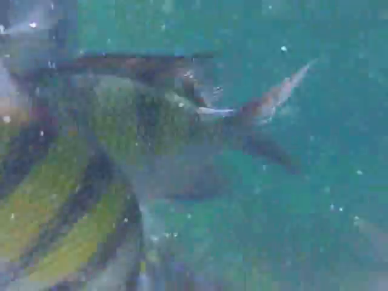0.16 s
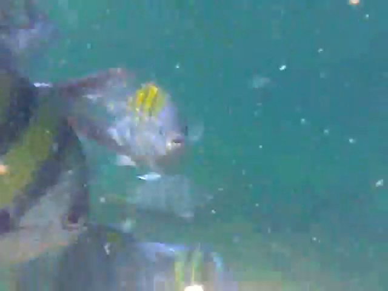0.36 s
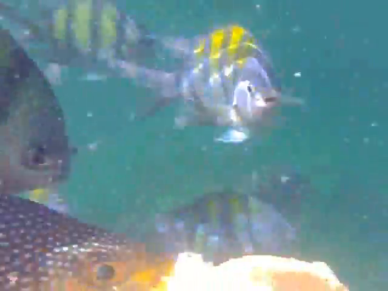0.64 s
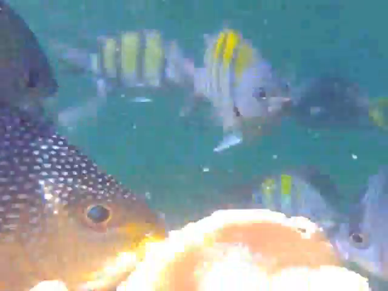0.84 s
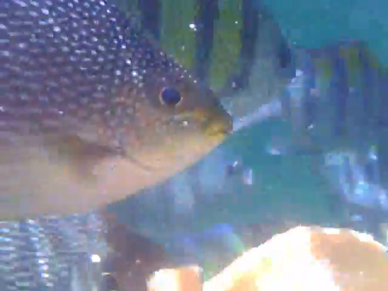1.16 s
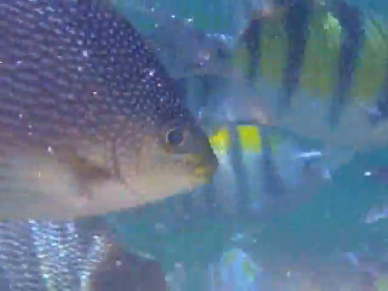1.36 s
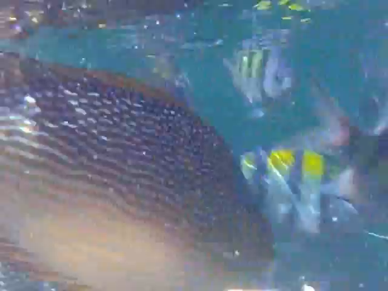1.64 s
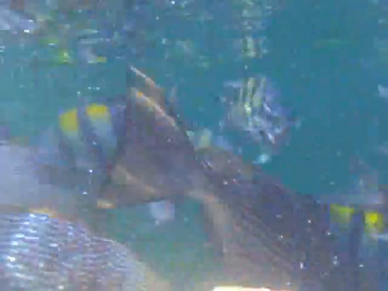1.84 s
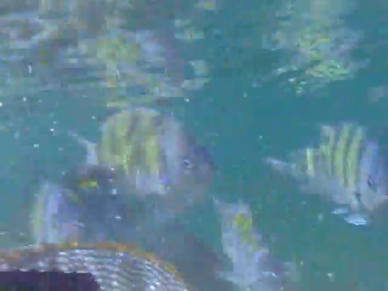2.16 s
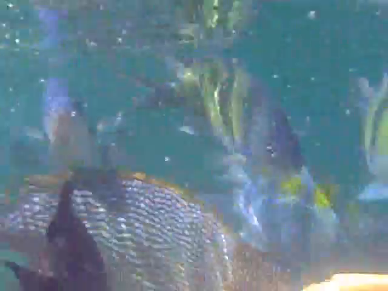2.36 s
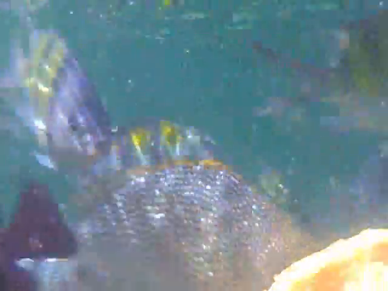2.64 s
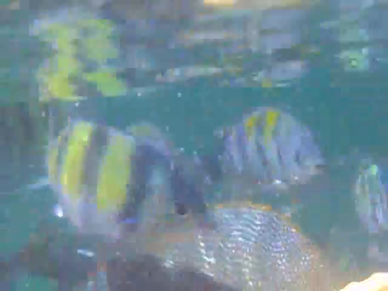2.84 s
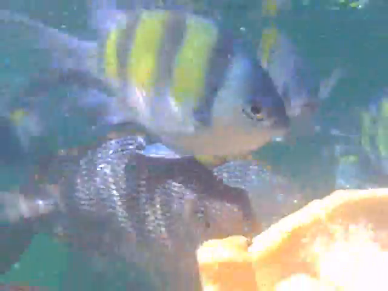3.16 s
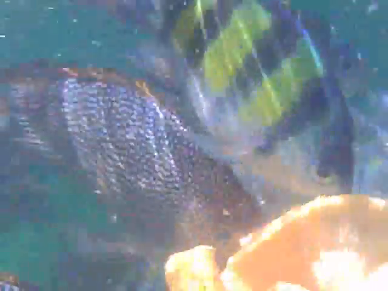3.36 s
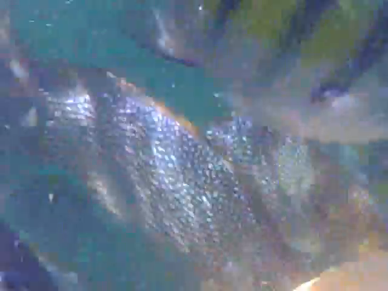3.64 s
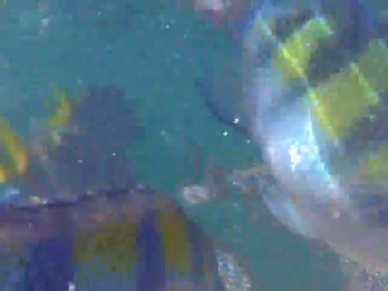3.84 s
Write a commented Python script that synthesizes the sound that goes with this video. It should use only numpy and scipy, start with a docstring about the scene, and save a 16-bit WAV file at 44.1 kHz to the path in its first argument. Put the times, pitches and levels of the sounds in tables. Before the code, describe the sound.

Irregular muffled bumps on a submerged camera housing, with deep water rumble and faint bubbles.

```python
"""A camera housing rings low as fish and hands bump and rub it, just under the sea surface.
Impacts excite the damped modes of its shell, and friction drives them continuously. Bubbles ring and
gurgle as resonators, far shrimp tick, and the swell presses on the housing over a rumble and wash.
The camera samples slowly and holds each value, so images of the low sound appear in the treble."""
import sys
import numpy as np
from scipy import signal
from scipy.fft import rfft, irfft
from scipy.io import wavfile
from scipy.ndimage import uniform_filter1d

SR = 44100
rng = np.random.default_rng(int(sys.argv[2]) if len(sys.argv) > 2 else 0)


def generate_wav(signal):
    """Clip the signal to [-1, 1] and save it as 16-bit WAV at the path in sys.argv[1]."""
    frames = np.transpose(np.atleast_2d(signal))
    scaled = np.clip(frames, -1, 1) * 32767
    pcm = np.round(scaled).astype(np.int16)
    wavfile.write(sys.argv[1], SR, pcm)


N = 176400


# Impacts on the shell: start_s, low_db, low_hz, upper_db, upper_hz, rap_db, low_t60_s, low_rise_s
SHELL_IMPACTS = [(0.145, -33, 138.6, -72, 264, -67, 0.22, 0.005),
                 (0.248, -18, 132.3, -43, 262, -62, 0.099, 0.0068),
                 (0.377, -11.5, 157.4, -21, 312, -33.5, 0.14, 0.0027),
                 (0.469, -45, 150, -34, 330, -41, 0.055, 0.0028),
                 (0.481, -16.5, 149.6, -29.5, 327, -40, 0.18, 0.004),
                 (0.509, -13, 138, -14.5, 252, -45, 0.044, 0.003),
                 (0.521, -19, 168, -18.5, 253, -42, 0.046, 0.0046),
                 (0.566, -18.5, 113, -29, 260, -63, 0.049, 0.0057),
                 (0.6, -25.5, 148.4, -30.5, 283, -69, 0.073, 0.0067),
                 (0.726, -30, 178, -35, 258, -57, 0.065, 0.0052),
                 (0.762, -32, 191, -57, 280, -68, 0.066, 0.0027),
                 (0.823, -16, 171.8, -35.5, 283, -67, 0.062, 0.0037),
                 (0.875, -34, 151.4, -33.5, 341, -59, 0.17, 0.0026),
                 (1.139, -30, 138, -56, 320, -70, 0.12, 0.0045),
                 (1.183, -26, 173, -50, 261, -65, 0.082, 0.002),
                 (1.265, -40, 138, -60, 277, -65, 0.046, 0.0093),
                 (1.472, -70, 159, -28, 278, -78, 0.052, 0.0075),
                 (1.633, -28.5, 145, -31, 290, -41, 0.067, 0.0029),
                 (1.745, -34.5, 116, -39.5, 263, -60, 0.085, 0.0084),
                 (1.938, -42.5, 211, -27, 266.4, -51, 0.22, 0.0061),
                 (2.016, -33.5, 139, -42.5, 353, -56, 0.058, 0.0045),
                 (2.1, -32, 197, -16.5, 267, -54, 0.06, 0.0071),
                 (2.112, -19.5, 150, -23.5, 303, -44.5, 0.076, 0.0033),
                 (2.273, -22.5, 176, -13.5, 266, -37, 0.035, 0.004),
                 (2.2912, -19, 135, -12.5, 300, -31.5, 0.073, 0.0034),
                 (2.495, -30, 171, -43, 266, -64, 0.021, 0.003),
                 (2.848, -34.5, 123, -31, 280, -54, 0.046, 0.0052),
                 (2.887, -34.5, 122.5, -29.5, 330, -40.5, 0.11, 0.0054),
                 (2.919, -50, 125, -30.5, 305, -67, 0.069, 0.0012),
                 (3.425, -17.5, 154.7, -19.5, 253, -42, 0.063, 0.005),
                 (3.448, -17, 129.6, -43, 261, -47.5, 0.1, 0.003),
                 (3.479, -12.5, 165.2, -45, 260, -53, 0.057, 0.0065),
                 (3.7, -30, 186.5, -40.5, 307, -58, 0.078, 0.0044),
                 (3.934, -24, 140, -61, 250, -56, 0.13, 0.0028)]

def shell_bumps():
    """Modal vibration: each impact excites four damped modes, the higher ones just after the lowest."""
    out = np.zeros(N)
    rap_hz, knock_hz, lag_s = 717, 440, 0.003
    for start_s, low_db, low_hz, upper_db, upper_hz, rap_db, t60_s, rise_s in SHELL_IMPACTS:
        add_ring(out, start_s - 0.84 * rise_s, low_db, low_hz, t60_s, rise_s, fade=0.94)
        add_ring(out, start_s + lag_s / 2, upper_db, upper_hz, t60_s / 2, rise_s=0.0013, fade=0.94)
        add_ring(out, start_s + lag_s, rap_db, rap_hz, t60_s=0.015, rise_s=0.0018, fade=1.72)
        add_ring(out, start_s + lag_s, rap_db + 2.5, knock_hz, t60_s=0.027, rise_s=0.0018, fade=1.72)
    add_ring(out, 0, level_db=-21, pitch_hz=155, t60_s=0.22, rise_s=0.0013)  # an opening ring fades
    return -out  # the shell gives inward first


# Shoves on the housing: start_s, level_db, pitch_hz
HOUSING_SHOVES = [(0.172, -22.5, 34.3), (0.486, -13.5, 35.3), (0.869, -28, 30), (0.927, -24, 33.5),
                  (1.16, -36, 90), (2.288, -21, 95), (2.888, -28, 79.6), (3.322, -42, 59),
                  (3.436, -13.5, 34.3), (3.929, -20, 68.5)]

def housing_thuds():
    """Heavily damped motion: the whole housing yields in one slow push, spent within a cycle."""
    out = np.zeros(N)
    for start_s, level_db, pitch_hz in HOUSING_SHOVES:
        add_ring(out, start_s, level_db, pitch_hz, t60_s=0.58 / pitch_hz, rise_s=0.62 / pitch_hz, fade=0.98)
    return out


# Strength of the rubbed modes: time_s, low_db, upper_db
RUB_LEVELS = [(0.0, -55, -65), (0.32, -42.5, -101), (0.47, -39, -51.5), (0.57, -27, -42.5),
              (0.72, -40.5, -56), (0.89, -43, -54), (1.06, -54, -56.5), (1.17, -39, -59.5),
              (1.26, -43.5, -80), (1.46, -56, -52), (1.6, -52.5, -50), (1.99, -50, -58.5),
              (2.23, -47.5, -41.5), (2.35, -49, -54), (2.56, -52.5, -57), (2.83, -53.5, -51),
              (2.99, -51, -48), (3.34, -49.5, -49), (3.52, -43, -65), (4.0, -41, -62)]

def shell_rubbing():
    """Forced vibration: uneven friction and flow keep the shell's low and upper modes sounding."""
    low = grainy_band(centre_hz=147, width_hz=36.2, spread_db=2.5, grains_per_s=46)
    upper = grainy_band(centre_hz=295.6, width_hz=120, spread_db=2.5, grains_per_s=80)
    return low * gain_curve(RUB_LEVELS, 1) + upper * gain_curve(RUB_LEVELS, 2)


# Single bubbles: start_s, level_db, pitch_hz, t60_s
BUBBLE_RINGS = [(.076, -51.5, 1390, 0.009), (.843, -50, 940, 0.011), (1.234, -53, 1290, .012),
                (1.543, -42.5, 1490, 0.0058), (1.548, -54, 2700, .01), (1.944, -44, 1004, 0.043),
                (2.178, -38, 790, 0.02), (2.195, -33, 650, 0.0091), (2.909, -51.5, 3900, 0.024),
                (2.917, -39.5, 850, 0.026), (2.922, -54.5, 1940, 0.081), (2.964, -40, 452, 0.24),
                (2.973, -38.5, 1043, 0.056), (3.0, -43.5, 1190, 0.033), (3.076, -33.5, 467, 0.12),
                (3.078, -42.5, 1670, 0.0088), (3.107, -35, 2270, 0.017), (3.135, -44.5, 2550, 0.0083),
                (3.145, -39.5, 950, 0.049), (3.144, -50.5, 3580, 0.015), (3.246, -50, 1980, 0.02),
                (3.258, -40.5, 1900, 0.02), (3.273, -52, 1460, 0.016), (3.369, -56, 3180, 0.01),
                (3.4255, -36.5, 1660, 0.0016)]

def bubbles():
    """Bubble resonance: trapped air is a spring, the water a mass; each hisses as it breaks off."""
    out = np.zeros(N)
    hiss_db, hiss_samples = -14.5, 2048  # level relative to the ring
    for start_s, level_db, pitch_hz, t60_s in BUBBLE_RINGS:
        add_ring(out, start_s, level_db, pitch_hz, t60_s, rise_s=0.00028, glide=-0.046)
        hiss = unit_rms(resonance(rng.standard_normal(hiss_samples), 0.96 * pitch_hz, 0.11 * pitch_hz))
        age = np.arange(hiss_samples) / (0.12 * t60_s * SR)  # in rise times of the hiss
        envelope = age * np.exp(1 - age)
        first = int(start_s * SR)
        out[first:first + hiss_samples] += undb(level_db + hiss_db) * envelope * hiss
    return out


# Strength of two bubble clouds: time_s, high_db, low_db
GURGLE_LEVELS = [(0.05, -80, -78), (0.42, -113, -85), (0.58, -70, -74), (0.96, -76.5, -101),
                 (1.42, -70.5, -72), (1.62, -61.5, -76), (1.97, -66.5, -67.5), (2.19, -58.5, -82),
                 (2.59, -62, -64), (2.83, -60, -70), (3.02, -55, -48), (3.12, -54, -66), (3.31, -55.5, -51),
                 (3.48, -64, -65), (3.76, -73.5, -80.5), (4.0, -70, -88)]

def gurgle():
    """Superposition: clouds of smaller and larger bubbles merge into a high and a low gurgle."""
    high = bubble_cloud(centre_hz=1036, spread_octaves=0.43, count=3000)
    low = bubble_cloud(centre_hz=490, spread_octaves=0.298, count=900)
    return high * gain_curve(GURGLE_LEVELS, 1) + low * gain_curve(GURGLE_LEVELS, 2)


def bubble_cloud(centre_hz, spread_octaves, count):
    """Size sets resonance: similar bubbles ring near one pitch at random times, each gliding up."""
    out = np.zeros(N)
    starts_s = rng.random(count) * N / SR
    pitches_hz = centre_hz * 2 ** (spread_octaves * rng.uniform(-1.01, 1, count))
    levels_db = rng.exponential(2, count)
    for start_s, level_db, hz in zip(starts_s, levels_db, pitches_hz):
        add_ring(out, start_s, level_db, hz, t60_s=28.6 / hz, rise_s=1 / hz, glide=0.18)
    return unit_rms(out)


# Clear shrimp snaps: time_s, level_db
SHRIMP_SNAPS = [(0.0772, -51), (0.097, -51), (0.3456, -55), (0.419, -49), (0.645, -52), (0.7296, -53),
                (0.916, -55), (1.249, -55), (1.29, -49), (1.5334, -49), (1.545, -50), (1.616, -57),
                (1.7012, -55), (1.7582, -50.5), (1.793, -54), (1.8144, -51), (1.982, -57), (2.028, -55),
                (2.4094, -55), (2.5895, -54), (3.0985, -48), (3.1451, -47), (3.3206, -49.5), (3.4265, -58)]

def shrimp(faint_count=200, snap_s=0.0024):
    """Broadband transients: far snaps arrive as short bright ticks, a few clear and many faint."""
    impulses = np.zeros(N)
    impulses[rng.integers(0, N, faint_count)] = undb(-65 - rng.exponential(0.5, faint_count))
    for time_s, level_db in SHRIMP_SNAPS:
        impulses[int(time_s * SR)] = undb(level_db)
    envelope = np.convolve(impulses, np.hanning(int(snap_s * SR) + 3), "same")
    return envelope * unit_rms(resonance(rng.standard_normal(N), centre_hz=7000, width_hz=3500))


# Surges of the swell: peak_s, pressure_full_scale, half_width_s
SWELL_SURGES = [(0.02, -.13, .06), (0.36, .04, .13), (1.24, .11, .06), (1.52, -.125, .08), (1.8, .095, .12),
                (2.12, -.12, .07), (2.4, .07, .1), (2.545, -.11, .03), (3.31, -.07, .07), (3.47, .17, .08),
                (3.76, -.14, .05)]

def swell(chop_hz=7, chop_db=-35):
    """Wave pressure: slow Gaussian surges press on the housing while small waves rock it."""
    t = np.arange(N) / SR
    surges = sum(pressure * np.exp(-((t - peak_s) / half_width_s) ** 2)
                 for peak_s, pressure, half_width_s in SWELL_SURGES)
    chop = rng.standard_normal(N)
    for width_hz in (chop_hz, 2 * chop_hz, 2 * chop_hz):
        chop = resonance(chop, chop_hz, width_hz)
    return surges + undb(chop_db) * unit_rms(chop)


# Strength of the moving water: time_s, level_db
RUMBLE_LEVELS = [(0.0, -30), (0.21, -61), (0.46, -52), (0.5, -18.5), (0.55, -39), (1.25, -41), (1.45, -53),
                 (1.6, -48.5), (1.8, -49.5), (2.28, -49.5), (2.37, -37), (2.46, -62), (2.58, -42.5),
                 (2.72, -50), (3.0, -45.5), (3.16, -54), (3.42, -29.5), (3.6, -39.5), (4.0, -53)]

def water_rumble():
    """Random pressure fluctuation: moving water makes a deep rumble and a more uneven slosh."""
    rumble = grainy_band(centre_hz=25.8, width_hz=28.4, spread_db=1.8, grains_per_s=15)
    slosh = grainy_band(centre_hz=94.6, width_hz=40.6, spread_db=8.5, grains_per_s=25.83)
    return (rumble + undb(-5) * slosh) * gain_curve(RUMBLE_LEVELS, 1)


# Spectrum of the sea's wash: frequency_hz, relative_density_db
WASH_SPECTRUM = [(120, -61), (200, 11), (277, -2), (322, -28), (657, -71), (774, -21.5), (2100, -22.5),
                 (7000, -29), (9100, -7), (15400, -120)]

def sea_wash(level_db=-56.5):
    """Stationary noise: the sea's steady wash keeps one spectral shape, strongest in the bass."""
    hz, density_db = np.array(WASH_SPECTRUM).T
    log_bins = np.log(np.fft.rfftfreq(N, 1 / SR) + 1)
    colour = undb(np.interp(log_bins, np.log(hz), density_db, left=-80, right=-80))
    return undb(level_db) * unit_rms(irfft(rfft(rng.standard_normal(N)) * colour, N))


def add_ring(out, start_s, level_db, pitch_hz, t60_s, rise_s, glide=0., fade=1.):
    """Damped oscillation, its envelope peaking at level_db; fade 1 is exponential, 2 Gaussian."""
    t = np.arange(int((t60_s + 4 * rise_s) * SR)) / SR
    attack = (1 - np.exp(-t / rise_s)) ** 2
    envelope = attack * np.exp(-np.log(1000) * (t / t60_s) ** fade)
    ring = envelope / envelope.max() * np.sin(2 * np.pi * pitch_hz * t * (1 + glide * t / t60_s))
    first = max(int(start_s * SR), 0)
    out[first:first + len(t)] += undb(level_db) * ring[:N - first]


def grainy_band(centre_hz, width_hz, spread_db, grains_per_s):
    """Amplitude modulation: noise in uneven grains drives two resonances in series."""
    grain_samples = int(SR / grains_per_s)
    grain_db = spread_db * np.minimum(rng.exponential(size=N // grain_samples + 1), 2.03)
    envelope = uniform_filter1d(np.repeat(undb(grain_db), grain_samples)[:N], grain_samples)
    narrow = resonance(rng.standard_normal(N) * envelope, centre_hz, width_hz)
    return unit_rms(resonance(narrow, centre_hz, 2 * width_hz))


def resonance(x, centre_hz, width_hz):
    """A second-order resonator passes one band."""
    return signal.lfilter(*signal.iirpeak(centre_hz, centre_hz / width_hz, fs=SR), x)


def gain_curve(table, column):
    """Gain over time, interpolated in decibels."""
    rows = np.array(table)
    return undb(np.interp(np.arange(N) / SR, rows[:, 0], rows[:, column]))


def undb(db):
    return 10 ** (np.asarray(db) / 20)


def unit_rms(x):
    return x / np.sqrt(np.mean(x ** 2))


def scene():
    """Linear superposition: all sources add at the housing, in one channel."""
    water = water_rumble() + swell() + sea_wash()
    housing = shell_bumps() + housing_thuds() + shell_rubbing()
    return (housing + bubbles() + gurgle() + shrimp() + water)[None]


def record(dry):
    """Zero-order hold: holding each slow sample mirrors the low spectrum into the treble."""
    sample_hz, top_hz = 14000, 15400
    grit_db, slope_window_s = -19, 0.0019  # gritty hiss that swells with loud, fast-changing sound
    band_limited = signal.sosfilt(signal.butter(6, sample_hz / 2, fs=SR, output="sos"), dry[0])
    count = int(N * sample_hz / SR) + 1
    samples = np.interp(np.arange(count) * SR / sample_hz, np.arange(N), band_limited)
    slope = uniform_filter1d(np.abs(np.gradient(samples)), int(slope_window_s * sample_hz))
    samples += undb(grit_db) * slope * rng.standard_normal(count)
    held = samples[np.arange(N) * sample_hz // SR]
    return signal.sosfilt(signal.ellip(10, .2, 80, top_hz, fs=SR, output="sos"), held)[None]


dry = scene()
out = record(dry)
generate_wav(out)
```